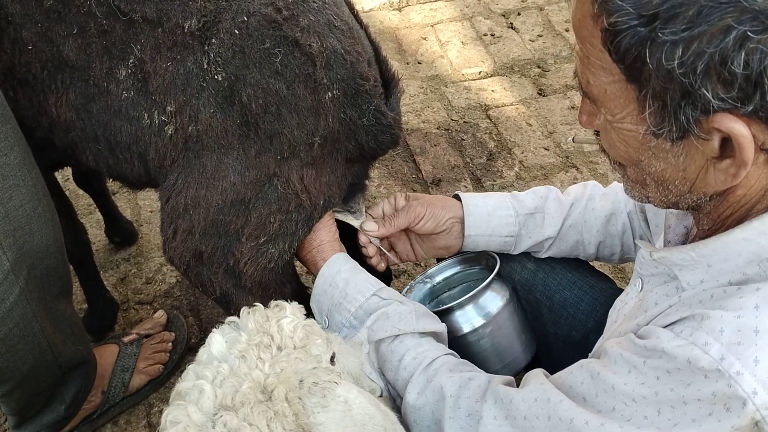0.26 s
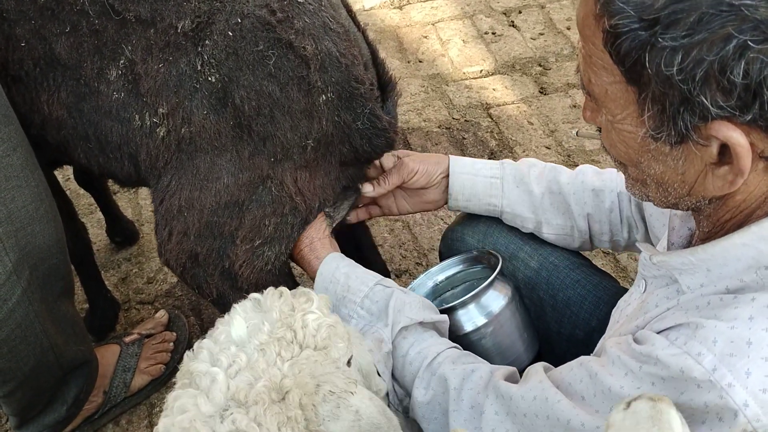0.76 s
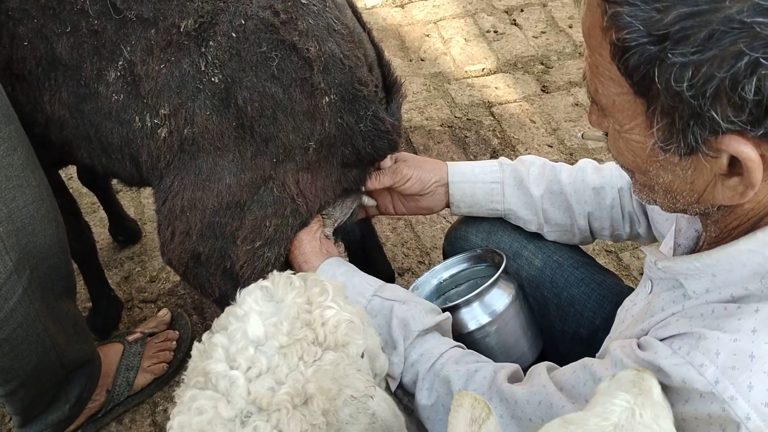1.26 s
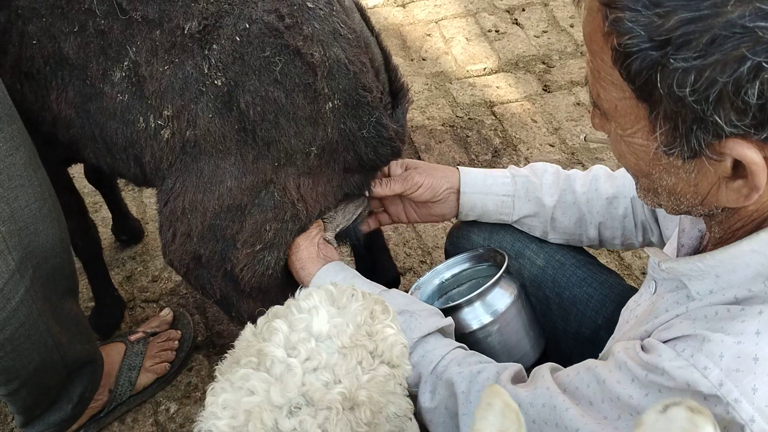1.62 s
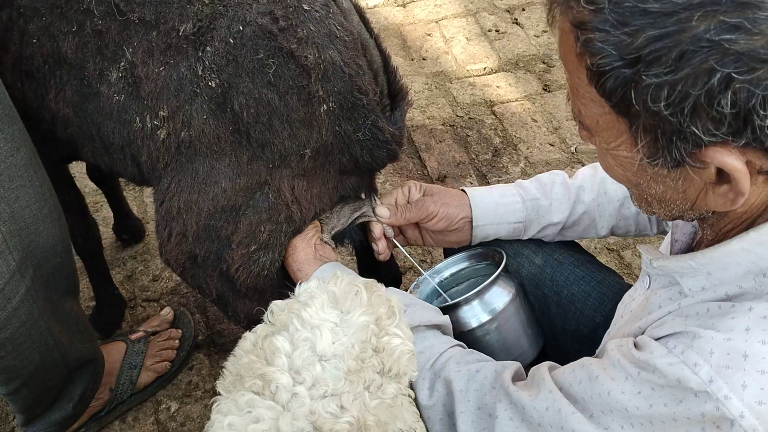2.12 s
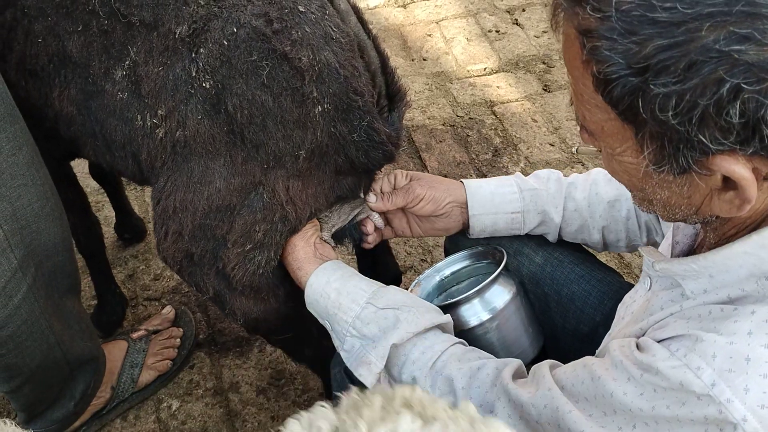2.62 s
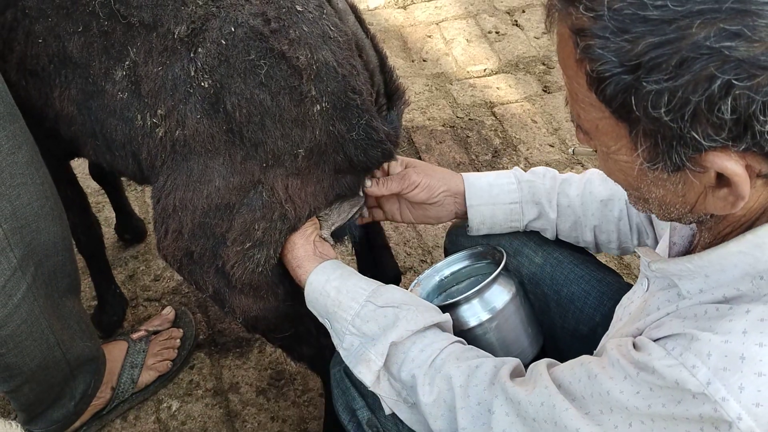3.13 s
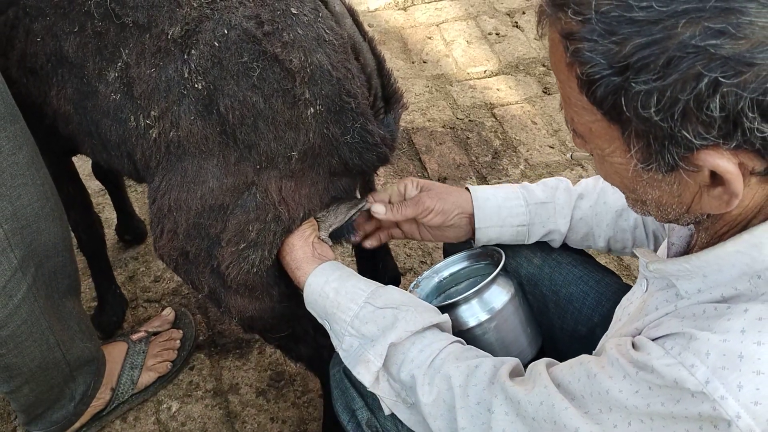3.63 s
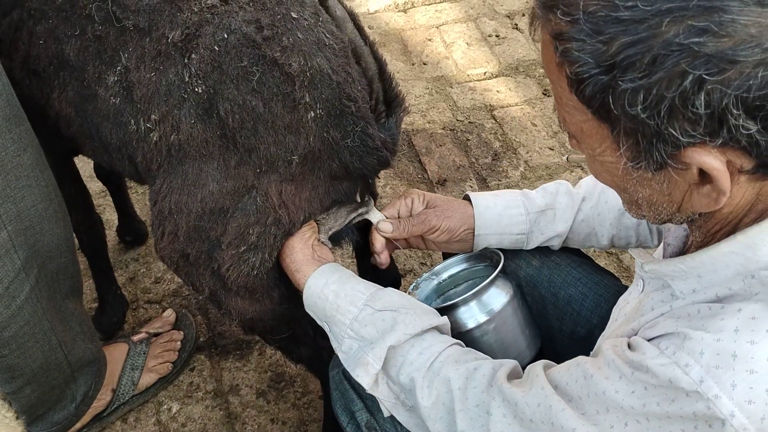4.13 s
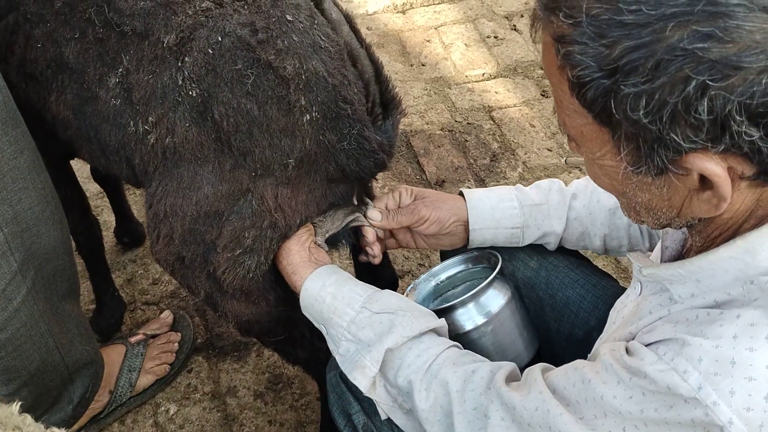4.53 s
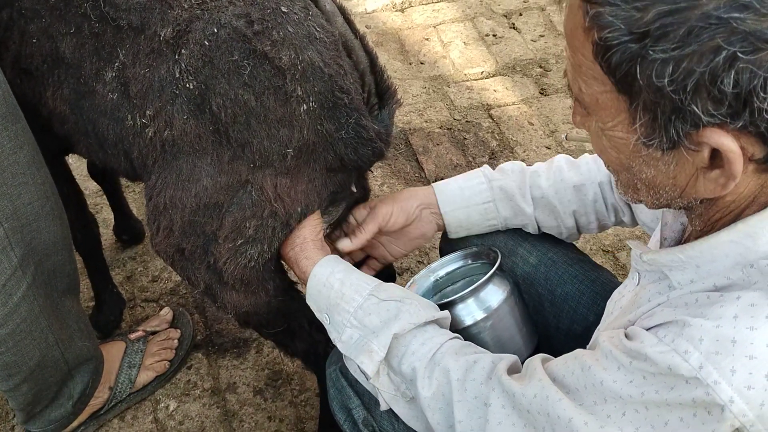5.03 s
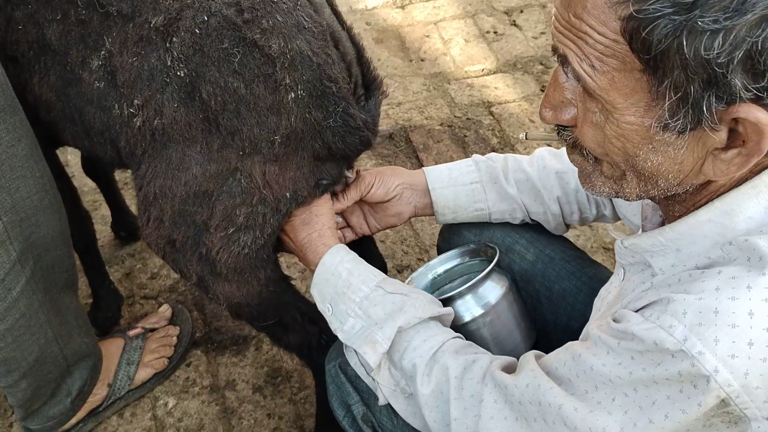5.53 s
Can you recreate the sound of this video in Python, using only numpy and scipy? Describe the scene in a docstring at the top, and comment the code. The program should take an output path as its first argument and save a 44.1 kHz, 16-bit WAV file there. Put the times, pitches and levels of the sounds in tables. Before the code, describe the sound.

A quiet outdoor yard is heard through a hand-held microphone with a soft low rumble and dull bumps, strongest around 1 to 2 seconds. In the first 0.6 seconds a sandal creaks on brick and cloth rustles; a sharp tick and another creak come at about 1.1 seconds. Faint sparrow chirps and thin whistles, mostly on the left, and soft dove coos recur throughout. From about 2.3 seconds, hand milking sends thin jets hissing into a steel can, the first with a bright sizzle and small bubbles. More squirts follow near 3, 3.6 and 4.2 seconds, some with tiny squeaks. At 4.1 seconds a sheep close on the left starts a nasal hum that opens into one quavering, slightly raspy bleat, by far the loudest sound, ending near 5 seconds. A faint chirp, squirt, creak and coo fill the last second.

```python
"""A brick yard, heard through a softly rumbling hand-held microphone. First a sandal sticks and slips,
cloth rustles, and sparrows, a dove and other birds start calling. From about 2 s a goat is milked by hand:
thin jets hiss and bubble into a steel can. At 4.1 s a sheep bleats once, close on the left. Its vocal
folds hum through the nose, then the mouth opens and catches of the larynx make the call quaver.
It shuts near 5 s, leaving a last chirp, squirt, creak and coo."""
import sys
import numpy as np
from scipy import signal
from scipy.fft import rfft, irfft
from scipy.io import wavfile
from scipy.ndimage import uniform_filter1d, minimum_filter1d

SR = 44100
rng = np.random.default_rng(int(sys.argv[2]) if len(sys.argv) > 2 else 0)


def unload_audio(sound):
    """Save the sound as a 16-bit wav file, at the path given as the first command line argument."""
    columns = np.transpose(np.atleast_2d(sound))
    # keep every value between -1 and 1, then stretch to whole-number steps
    steps = np.round(np.clip(columns, -1, 1) * 32767)
    wavfile.write(sys.argv[1], SR, steps.astype(np.int16))


N = 254012
T = np.arange(N) / SR
FREQS = np.maximum(np.arange(2049) * SR / 4096, 1)
MOUTH_OPENS_S, MOUTH_SHUTS_S = 4.335, 4.972


def undb(db):
    """Decibels to gain."""
    return 10 ** (np.asarray(db) / 20)


def unit(x):
    """Scale to rms 1."""
    return x / np.sqrt(np.mean(x ** 2))


def pan(db):
    """Stereo gains, with the left db louder than the right."""
    return undb(np.array([[db], [-db]]) / 2)


def curve(rows):
    """The columns of a table as automation lanes: straight lines in time."""
    s, *columns = np.transpose(rows)
    return [np.interp(T, s, c) for c in columns]


def envelope(start, end, attack_s, release_s):
    """Smooth attack from start, hold until end, exponential release."""
    attack = np.sin(np.pi / 2 * np.clip((T - start) / attack_s, 0, 1)) ** 2
    return attack * np.exp(-np.maximum(T - end, 0) / release_s)


def swell(s, half_length):
    """A bell-shaped rise and fall around time s."""
    return np.exp(-((T - s) / half_length) ** 2)


def walk(rate, size=N):
    """Smooth random modulation with rms 1 and rate new values a second."""
    hold = max(int(SR / rate), 1)
    steps = np.repeat(rng.standard_normal(size // hold + 1), hold)
    return unit(uniform_filter1d(uniform_filter1d(steps, hold), hold)[:size])


def causal(gain):
    """The minimum-phase response of a passive body with this gain."""
    cepstrum = irfft(np.log(gain))
    half = len(cepstrum) // 2
    return np.exp(rfft(np.r_[cepstrum[0], 2 * cepstrum[1:half], np.zeros(half)]))


def colour(x, eq):
    """Filter by an EQ curve of (frequency [Hz], gain [dB]) points."""
    hz, db = np.transpose(eq)
    gain = undb(np.interp(np.log(FREQS), np.log(hz), db))
    response = irfft(causal(gain))
    return np.apply_along_axis(lambda v: signal.oaconvolve(v, response)[:len(v)], -1, x)


def noise(eq, side_db=0, pan_db=0):
    """Coloured stereo noise with rms 1; side_db sets the width."""
    mid, side = colour(rng.standard_normal((2, N)), eq)
    side = side * undb(side_db)
    return unit(np.array([mid + side, mid - side]) * pan(pan_db))


def glide(s, shape, scale, db, bend):
    """One sine note that follows a call shape from time s, its pitch multiplied by scale and bend."""
    at, hz, shape_db = np.transpose(shape)
    on = np.flatnonzero((T > s + at[0]) & (T < s + at[-1]))
    phase = 2 * np.pi * np.cumsum(scale * np.interp(T[on] - s, at, hz) * bend[on]) / SR
    note = np.zeros(N)
    note[on] = np.sqrt(2) * np.sin(phase) * undb(db + np.interp(T[on] - s, at, shape_db))
    return note


def yard(x, t60):
    """Scattered echoes from walls and ground, different on each side, dying 60 dB in t60 seconds."""
    t = T[:SR // 2]
    echoes = rng.standard_normal((2, len(t))) * np.exp(rng.standard_normal((2, len(t))))
    echoes = echoes * undb(-60 * t / t60) * np.clip(t / .0073 - .5, 0, 1)
    echoes /= np.sqrt(np.sum(echoes ** 2, axis=1, keepdims=True))
    return signal.fftconvolve(np.atleast_2d(x), echoes, axes=1)[:, :N]


def among_walls(x, direct_db=-4, walls_db=-5, yard_db=-8):
    """A sound smeared by the nearest walls and by the wider yard."""
    # scattered echoes carry little low end: (frequency [Hz], gain [dB])
    scatter_eq = [(600, -16), (1600, 0)]
    echoes = undb(walls_db) * yard(x, t60=.13) + undb(yard_db) * yard(x, t60=.27)
    return undb(direct_db) * x + colour(echoes, scatter_eq)


def taps(hits, eq, decay_s, gain_db, pan_db, yard_db=-14):
    """Brief contacts, each a quickly dying burst of grit."""
    force = np.zeros(N)
    for s, db in hits:
        start = int(s * SR)
        age = T[:min(SR // 8, N - start)]
        force[start:start + len(age)] += undb(db + gain_db) * np.exp(-age / decay_s)
    direct = force * noise(eq, pan_db=pan_db)
    return direct + undb(yard_db) * yard(direct, t60=.091)


def air(level_db=-59.5, flicker_db=1.03):
    """The quiet open-air bed."""
    # tone of the air: (frequency [Hz], gain [dB])
    air_eq = [(120, -32), (200, -10.5), (430, -13), (596, -10.5), (1170, -16.5), (1350, -15), (2900, -17.5),
              (4580, -26), (7220, -26.5), (7900, -23), (8820, -28), (9480, -75), (11200, -33.5),
              (15500, -38)]
    return noise(air_eq, side_db=2, pan_db=4) * undb(level_db + flicker_db * walk(22))


def handling(floor_db=-47.5, unrest_db=2, trim_db=-3.5):
    """The hand on the microphone: a restless rumble that swells as the grip shifts, and dull throbs."""
    # tone of the rumble: (frequency [Hz], gain [dB])
    rumble_eq = [(20, -36.5), (45, -1.5), (58, -17.5), (74, 2), (100, -7), (130, -12.5), (300, -69.5)]
    # shifts of the grip: (time [s], half length [s], level [dB])
    grips = [(0.497, 0.47, -48), (1.213, 0.19, -40), (2.136, 0.23, -37.5), (2.948, 0.31, -50.5),
             (3.714, 0.13, -46.5), (5.382, .1, -54)]
    # the casing throbs under the fingers: (time [s], half length [s], pitch [Hz], level [dB])
    throbs = [(.18, 0.061, 206, -42.5), (0.891, 0.05, 114, -33.5), (2.049, 0.11, 72.8, -32),
              (2.236, 0.022, 82, -45), (3.077, 0.04, 80, -38.5), (3.515, 0.043, 121.5, -40),
              (5.391, 0.13, 70.6, -48)]
    grip = undb(floor_db) + sum(undb(db) * swell(s, half) for s, half, db in grips)
    rumble = noise(rumble_eq, side_db=-21) * grip * undb(unrest_db * walk(12) + trim_db)
    casing = sum(np.sqrt(2) * undb(db) * swell(s, half) * np.sin(2 * np.pi * hz * (T - s))
                 for s, half, hz, db in throbs)
    return rumble + casing


def bodies(bump_floor_db=-54, rustle_floor_db=-65.5, unrest_db=2, crumple_db=3.5, trim_db=-1):
    """Bodies move close by, each time with a dull bump and cloth that crumples unevenly."""
    # movements: (time [s], half length [s], bump [dB], rustle [dB])
    moves = [(0.166, 0.065, -42.5, -49), (.43, 0.22, -47, -49.5), (1.019, 0.23, -47, -57.5),
             (1.23, 0.074, -45, -58.5), (1.917, .12, -50, -60.5), (2.419, 0.055, -46, -57.5),
             (2.733, 0.14, -60, -65.5), (3.093, 0.091, -49, -79), (3.725, 0.056, -56, -81),
             (5.427, 0.092, -50.5, -50), (5.63, 0.06, -58.5, -57.5)]
    # tone of the bumps and of the cloth: (frequency [Hz], gain [dB])
    bump_eq = [(60, -40.5), (100, 0), (125, 7.5), (200, -2.5), (290, -13), (500, -52)]
    cloth_eq = [(150, -15), (280, 10.5), (500, -2), (1200, -12), (2800, -14.5), (5000, -39.5), (12000, -55)]
    bump, rustle = undb(bump_floor_db), undb(rustle_floor_db)
    for s, half, bump_db, rustle_db in moves:
        motion = swell(s, half)
        bump, rustle = bump + undb(bump_db) * motion, rustle + undb(rustle_db) * motion
    bumps = noise(bump_eq, side_db=-15.5) * bump * undb(unrest_db * walk(14) + trim_db)
    cloth = noise(cloth_eq, side_db=.5, pan_db=3.5) * rustle * undb(crumple_db * walk(70) + trim_db)
    return bumps + cloth


def birds(waver=.0092, buzz_depth=.12, buzz_hz=130, cheep_after_s=.113):
    """Small birds on the left: faint peeps, sparrows, a mewing call and a whistle that turns to a buzz."""
    # call shapes: (time into the call [s], pitch [Hz], level [dB])
    peep = [(0, 3210, -14), (.015, 3435, 5), (0.046, 3580, 0.5), (.07, 3380, -25)]
    chirp = [(0, 2600, -10), (.005, 3150, 3.5), (.01, 3600, 2), (.014, 5250, -4), (.018, 5050, -3),
             (.024, 4350, 7), (.031, 4300, 6), (.036, 4280, -6)]
    cheep = [(0, 2710, -8), (.007, 3115, -12.5), (.015, 3300, -4), (.022, 4460, -23.5), (.029, 4050, -10),
             (.039, 3600, -12)]
    mew = [(0, 1700, -22), (.035, 2170, -8), (.1, 2330, -3), (.18, 2360, 0), (.22, 2330, -4),
           (.26, 2320, -20)]
    mew_upper = [(.015, 2250, -22), (.04, 2530, -7), (.11, 2615, 0), (.18, 2560, -2), (.22, 2390, -12)]
    whistle = [(0, 5000, -13), (.04, 5200, -11.5), (.08, 5480, -1.5), (.12, 5615, -8.5), (0.158, 5760, -5)]
    buzz = [(.11, 5900, -11.5), (.16, 6200, -15), (.22, 6150, -11), (.31, 5700, -23)]
    # distant peeps and two-voiced mews: (time [s], pitch scale [ratio], level [dB])
    peep_cues = [(0, 1.17, -71.5), (.082, .95, -61), (.86, 1.14, -68), (1.658, 0.84, -70), (1.76, .8, -68),
                 (3.523, 0.97, -59.5), (5.714, 1.1, -71)]
    mew_cues = [(1.286, 0.99, -49), (3.554, .96, -51.5)]
    # sparrow calls: (time [s], pitch scale [ratio], level [dB], notes [count])
    sparrow_cues = [(.355, 1.02, -48.5, 2), (2.512, .995, -49.5, 2), (5.151, 1.01, -51, 1)]
    # whistles: (time [s], level [dB])
    whistle_cues = [(0.343, -48.5), (1.796, -49), (4.088, -46)]
    wobble = 1 + waver * walk(200)
    trill = 1 + buzz_depth * np.sin(2 * np.pi * buzz_hz * T + walk(150))
    calls = sum(glide(s, peep, scale, db, wobble) for s, scale, db in peep_cues)
    for s, scale, db, notes in sparrow_cues:
        calls += glide(s, chirp, scale, db, wobble)
        if notes == 2:
            calls += glide(s + cheep_after_s, cheep, scale * 1.065, db + 10.5, wobble)
    for s, scale, db in mew_cues:
        calls += glide(s, mew, scale, db, wobble) + glide(s, mew_upper, 1, db - 1, wobble)
    whistles = sum(glide(s, whistle, 1, db, wobble) + glide(s, buzz, .97, db, trill)
                   for s, db in whistle_cues)
    return calls * pan(11) + whistles * pan(3)


def dove(waver=.0083, long_after_s=.219):
    """A soft, nearly pure coo, sometimes followed by a long one."""
    # coo shapes: (time into the note [s], pitch [Hz], level [dB])
    coo = [(0, 548, -22), (.04, 560, 0), (.085, 563, 0), (.125, 555, -22)]
    long_coo = [(0, 548, -22), (.05, 556, 0), (.13, 556, 0), (.21, 543, -9), (.37, 536, -14),
                (.46, 520, -28)]
    # calls: (time [s], pitch scale [ratio], level [dB], left minus right [dB], notes [count])
    cues = [(.545, 1, -43.5, -15.5, 2), (1.52, .96, -45, 5, 1), (4.624, 1, -40.5, -11.5, 2),
            (5.66, .95, -55, -13, 1)]
    wobble = 1 + waver * walk(270)
    song = np.zeros((2, N))
    for s, scale, db, pan_db, notes in cues:
        song += glide(s, coo, scale, db, wobble) * pan(pan_db)
        if notes == 2:
            song += glide(s + long_after_s, long_coo, scale, db, wobble) * pan(pan_db)
    return song


def ticks(faint_count=14, faint_db=-63, spread_db=2):
    """Drops and grit: a few sharp ticks among faint random ones."""
    # the sharpest ticks: (time [s], level [dB])
    sharp = [(.0695, -61), (.5312, -47.5), (.6782, -49), (1.1008, -38.5), (1.4144, -56), (1.4423, -53.5),
             (2.4936, -59), (2.8525, -53.5), (4.1043, -52.5)]
    # tone of a tick: (frequency [Hz], gain [dB])
    tick_eq = [(1000, -17), (3500, -11), (5500, 0.5), (7800, 7.5), (9600, -0.5), (11500, 1.5), (15500, -26)]
    faint = [(rng.uniform(0, T[-1]), faint_db + spread_db * rng.standard_normal())
             for _ in range(faint_count)]
    return taps(sharp + faint, tick_eq, decay_s=.0018, gain_db=3, pan_db=2)


def sandal(slip_every_s=.022, scatter_s=.0005, attack_s=.002, sole_db=-3, grit_db=-11, yard_db=-12):
    """A sandal sticks and slips on the brick; each slip rings the sole and crushes a little grit."""
    # shifts of weight, each a run of slips: (time [s], length [s], slip level [dB])
    creaks = [(0.131, .03, -50), (0.245, .01, -37), (0.304, .05, -37), (.377, .05, -29.5),
              (0.459, .075, -29.5), (.583, .03, -43), (1.137, .01, -28.5), (2.841, .01, -39),
              (5.389, .01, -39)]
    # modes of the sole: (frequency [Hz], decay [s], level [dB])
    modes = [(367, 0.0065, -15), (1153, 0.0055, -13.5), (1250, 0.0029, -11), (1690, 0.00081, -7),
             (2280, 0.0042, -13), (2870, 0.0013, -4)]
    # tone of the grit: (frequency [Hz], gain [dB])
    scuff_eq = [(150, -3), (400, -6), (700, 6), (1150, 4.5), (1450, 17.5), (1750, -26), (2050, 6),
                (2450, -30), (3300, 2.5), (8000, -16), (15000, -23)]
    slips = [(s + after + scatter_s * rng.standard_normal() * (after > 0), db)
             for s, length, db in creaks for after in np.arange(0, length, slip_every_s)]
    sole = np.zeros(N)
    hz, ring_s, mode_db = np.transpose(modes)[:, :, None]
    for s, db in slips:
        start = int(s * SR)
        age = T[:min(SR // 20, N - start)]
        detune, weight = rng.standard_normal((2, len(modes), 1))
        tones = np.sin(2 * np.pi * hz * (1 + .022 * detune) * age)
        ring = np.sum(undb(mode_db + 2 * weight) * np.exp(-age / ring_s) * tones, axis=0)
        sole[start:start + len(age)] += undb(db + sole_db) * ring * np.clip(age / attack_s, 0, 1)
    grit = taps(slips, scuff_eq, decay_s=.003, gain_db=grit_db, pan_db=5)
    return sole * pan(10) + undb(yard_db) * yard(sole, t60=.17) + grit


def squeaks(waver=.0067):
    """Brief pips that come with the jets of milk."""
    # shape of a pip: (time into the note [s], pitch [Hz], level [dB])
    pip = [(0, 2136, -13), (.008, 2170, 2), (0.016, 2130, -6.5), (.03, 2040, -44)]
    # pips: (time [s], pitch scale [ratio], level [dB], left minus right [dB])
    cues = [(2.284, .7, -43.5, 6), (2.993, 0.97, -39.5, -2), (3.032, 0.7, -52, 4), (3.087, .95, -52.5, -6),
            (3.09, .72, -56, 3), (3.61, 0.72, -50.5, 1)]
    wobble = 1 + waver * walk(200)
    return sum(glide(s, pip, scale, db, wobble) * pan(pan_db) for s, scale, db, pan_db in cues)


def can(level_db=-48.5, sizzle_db=2):
    """A jet grazes the thin steel wall of the can with a bright sizzle."""
    # ring of the steel: (frequency [Hz], gain [dB])
    steel_eq = [(1500, -31), (3700, -15), (4400, -3), (5000, -11), (5900, 4.5), (6500, -6), (7200, -5),
                (8300, 1), (9500, -29), (15000, -22)]
    graze = envelope(2.165, 2.24, attack_s=.055, release_s=.0095)
    return noise(steel_eq, pan_db=-2.5) * graze * undb(level_db + sizzle_db * walk(360))


def milking(spatter_db=1, splutter_db=1.3, ring_s=.0039):
    """Each squeeze sends a thin jet into the froth; it breaks into fine drops and a few larger bubbles."""
    # jets of milk: (time [s], length [s], level [dB], fall over the jet [dB])
    squirts = [(2.267, 0.14, -52.5, -0.5), (2.961, 0.086, -51.5, 6.5), (3.098, 0.028, -60, -2),
               (3.596, 0.26, -47, 12.5), (4.207, 0.069, -51, 1), (5.249, 0.26, -58.5, 0)]
    # tone of the jet: (frequency [Hz], gain [dB])
    milk_eq = [(400, -12), (1500, -4), (3000, 4.5), (4500, 0.5), (6000, 1.5), (8300, 1.5), (9600, -17),
               (12000, -9), (15500, -20.5)]
    # bubbles beaten into the milk: (time [s], pitch [Hz], level [dB])
    plops = [(2.343, 950, -60), (2.36, 724, -45.5), (2.365, 1060, -54), (2.388, 864, -51),
             (2.428, 890, -48.5), (2.441, 590, -56)]
    flow, froth, bubbles = np.zeros(N), np.zeros((2, N)), np.zeros(N)
    for s, length, db, fall_db in squirts:
        squeeze = envelope(s, s + length, attack_s=.007, release_s=.028)
        flow += squeeze * undb(db - fall_db * np.clip((T - s) / length, 0, 1))
    hiss = noise(milk_eq, pan_db=2.5)
    edges_hz = np.geomspace(500, 16000, 13)
    for band in zip(edges_hz, edges_hz[1:]):  # each band flickers on its own
        bandpass = signal.butter(2, band, "bandpass", fs=SR, output="sos")
        froth += signal.sosfilt(bandpass, hiss) * undb(1.5 * walk(160))
    for s, hz, db in plops:
        age = np.maximum(T - s, 0)
        bubbles += 2 * undb(db) * np.sin(2 * np.pi * hz * age) * np.exp(-age / ring_s)
    return unit(froth * undb(spatter_db * walk(900) + splutter_db * walk(60))) * flow + bubbles


def effort(voice_db=-17.5, hum_db=-31.5, leak_db=-14, tires_s=4.66, hum_lingers_s=.038):
    """Gains of the open voice, nasal hum and throaty friction: two shut-mouthed pushes, then the call."""
    # pushes with the mouth shut: (time [s], length [s], hum [dB], friction [dB])
    grunts = [(4.105, 0.045, -31, -43), (4.204, 0.18, -36, -44)]
    tired_s = np.maximum(T - tires_s, 0)
    mouth = envelope(MOUTH_OPENS_S, MOUTH_SHUTS_S, attack_s=.058, release_s=.014)
    hum = envelope(MOUTH_OPENS_S, MOUTH_SHUTS_S + hum_lingers_s, attack_s=.058, release_s=.014)
    mouth *= undb(voice_db - 17 * tired_s)  # both fade, in dB per second, as the sheep tires
    hum *= undb(hum_db - 31.5 * tired_s)
    friction = np.zeros(N)
    for s, length, push_db, friction_db in grunts:
        push = envelope(s, s + length, attack_s=.051, release_s=.037)
        hum = np.maximum(hum, undb(push_db) * push)
        mouth += undb(push_db + leak_db) * push  # a little voice passes the shut lips
        friction += undb(friction_db) * push
    return mouth, hum, friction


def vocal_tract(hz, phase, flutter_db=3, smear_s_per_khz=.0009):
    """Harmonics of the vocal folds, shaped by the throat and the moving jaw; hz is 0 outside the call."""
    # throat and mouth formants: (frequency [Hz], width [Hz], level [dB])
    formants = [(633, 93, -9.5), (773, 158, -6.5), (1060, 110, -19.5), (1220, 150, -36.5), (1540, 300, -10),
                (1749, 189, 7), (2114, 290, -10.5), (2353, 207, 0.5), (2488, 77, 0.5), (2830, 194, 0),
                (3040, 110, -8), (3360, 180, -16), (3717, 255, -12.5), (5400, 175, -22)]
    # the jaw's movement: (time [s], formant scale [ratio], brightness [dB per octave])
    jaw = [(4.33, 0.94, -8.5), (4.42, 0.96, -5), (4.54, 0.98, -5.5), (4.68, 1.01, -1), (4.76, 1, -5),
           (4.88, 1, -5), (4.97, 1.03, -6)]
    # the strongest formant lifts as the mouth opens wide: (time [s], gain [dB])
    opening = [(4.35, -7.5), (4.45, -5.5), (4.54, -2.5), (4.69, 3), (4.76, -2.5), (4.88, -4.5), (4.97, -13)]
    peaks = sum(undb(db) / (1 + (2 * (FREQS - f) / width) ** 2) ** 1.25 for f, width, db in formants)
    # the folds do not close all at once, so the upper harmonics of each pulse come late
    smear = np.exp(-1j * np.pi * smear_s_per_khz * FREQS ** 2 / 1000)
    throat = causal(peaks + undb(-94)) * smear
    on = hz > 0
    scale, bright_db, open_db = (lane[on] for lane in curve(jaw) + curve(opening))
    voice = np.zeros(N)
    for k in range(2, 44):
        scaled_hz = k * hz[on] / scale
        tilt_db = bright_db * np.clip(np.log2(scaled_hz / 2000), -.5, .5)
        lift_db = open_db * np.exp(-((scaled_hz - 1700) / 250) ** 2)
        # no two closures are alike, so each harmonic flutters, the high ones most
        flutter = np.clip(walk(70, size=len(scaled_hz)), -1.6, 1.6) * min(k / 13, 1)
        harmonic = (np.interp(scaled_hz, FREQS, throat) * np.exp(1j * k * phase[on])).real
        voice[on] += undb(tilt_db + lift_db + flutter_db * flutter) * harmonic
    voice[on] = unit(voice[on])
    return voice


def larynx(jitter=.003, shimmer_db=1.4, rasp_db=-20, rasp_build_s=.15, octave_db=-14, push_db=1):
    """Vocal fold pulses sound through the nose, then the open mouth; each catch dips pitch and level."""
    # the arch of the bleat: (time [s], pitch [Hz])
    arch = [(4.11, 152.5), (4.2, 159.4), (4.325, 184.9), (4.38, 208.9), (4.47, 215.3), (4.66, 214.6),
            (4.82, 207), (4.95, 195.8), (5.05, 152.2)]
    # catches that make the quaver: (time [s], half length [s], pitch drop [Hz], level drop [dB])
    catches = [(4.425, .016, 7, 1), (4.505, .02, 11, 2), (4.583, .018, 15, 7), (4.659, .014, 13, 6),
               (4.707, .008, 4, 6), (4.765, .02, 7, 3), (4.835, .014, 7, 2), (4.92, .014, 1, 4)]
    # air rushing through the folds, and throaty friction: (frequency [Hz], gain [dB])
    rasp_eq = [(300, -18), (600, -16), (900, -2), (1150, -1), (1700, 0), (2900, 6), (3400, 1), (4300, -8),
               (5500, -10.5), (8200, -11.5), (9500, -22.5), (11500, -17), (15500, -33)]
    grunt_eq = [(300, -5.5), (700, -16.5), (1200, 0.5), (1600, -17.5), (2100, -8.5), (2700, -34),
                (3400, -21), (4500, -40), (12000, -46)]
    hz, dip_db = curve(arch)[0], 0
    for s, half, drop_hz, drop_db in catches:
        catch = swell(s, half)
        hz, dip_db = hz - drop_hz * catch, dip_db - drop_db * catch
    phase = 2 * np.pi * np.cumsum(hz * (1 + jitter * walk(400))) / SR
    calling = (T > arch[0][0]) & (T < arch[-1][0])
    voice = vocal_tract(hz * calling, phase)
    rush = unit(rng.standard_normal(N) * (1 + .4 * np.cos(phase)))  # one puff of air a cycle
    last_push = swell(4.952, .023)  # a hoarse shove before the mouth shuts
    rasp = unit(colour(rush, rasp_eq)) * undb(rasp_db + 3.5 * last_push + 2 * walk(45))
    rasp *= np.clip((T - MOUTH_OPENS_S) / rasp_build_s, 0, 1)
    voice *= undb(shimmer_db * np.tanh(walk(250)) + dip_db)
    hum = np.sqrt(2) * (np.cos(phase) + undb(octave_db) * np.cos(2 * phase))
    mouth_gain, hum_gain, friction_gain = effort()
    mouth = (voice + rasp) * mouth_gain * undb(push_db * last_push)
    nose = hum * hum_gain * undb(dip_db + .7 * walk(90))
    grunt = unit(colour(rush, grunt_eq)) * friction_gain * undb(2 * walk(120))
    return mouth + nose + grunt


def sheep(close_db=3, yard_db=-22, lag_s=.00009, allpass_hz=400):
    """The bleat reaches the microphone from the left, with close echoes and the ring of the yard."""
    # early reflections off the ground and nearby bodies: (delay [s], level [dB])
    reflections = [(.0031, -19), (.0074, -17), (.0128, -19), (.021, -21)]
    # shading on the microphone's far side: (frequency [Hz], gain [dB])
    shade_eq = [(100, -13), (210, -2), (400, -5.5), (680, -4), (1290, -8), (1700, -12.5), (2800, -12),
                (3300, -17.5), (4400, -9), (8000, 0.5), (15000, -15)]
    voice = larynx()
    near = voice + sum(undb(db) * np.interp(T - delay, T, voice) for delay, db in reflections)
    # the far side is shaded, out of step above the bass, and a little late
    turn = np.tan(np.pi * allpass_hz / SR)
    pole = (1 - turn) / (1 + turn)
    shaded = signal.lfilter([-pole, 1], [1, -pole], colour(near, shade_eq))
    far = np.interp(T - lag_s, T, shaded)
    ring = yard(near, t60=.5) * pan(10)
    return undb(close_db) * np.array([near, far]) + undb(yard_db) * ring


def scene():
    """The stereo mix of everything in the yard."""
    calls = among_walls(birds() + dove() + squeaks())
    return sheep() + calls + milking() + can() + sandal() + ticks() + handling() + bodies() + air()


def record(dry, ceiling=.66, reaction_s=.012, top_hz=15700):
    """A limiter holds down any peak above the ceiling, and a steep low-pass cuts the top."""
    size = int(reaction_s * SR)
    allowed = ceiling / np.maximum(np.abs(dry).max(axis=0), ceiling)
    gain = uniform_filter1d(minimum_filter1d(allowed, 2 * size), size)
    return signal.sosfilt(signal.ellip(10, .2, 80, top_hz, fs=SR, output="sos"), dry * gain)


dry = scene()
out = record(dry)
unload_audio(out)
```